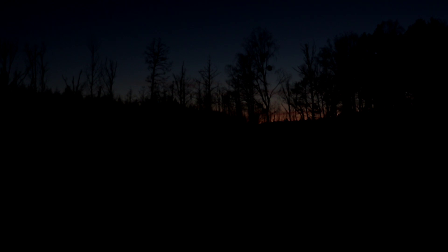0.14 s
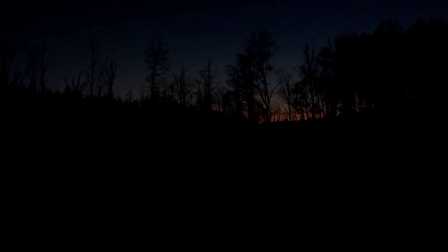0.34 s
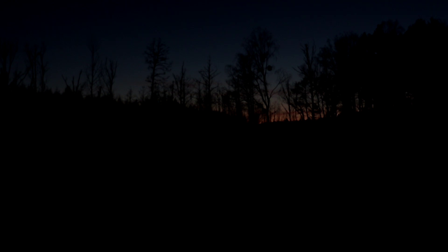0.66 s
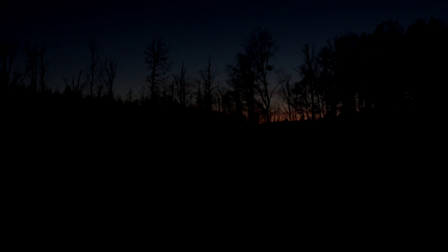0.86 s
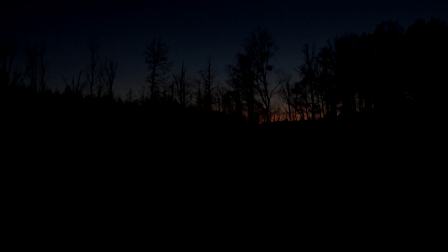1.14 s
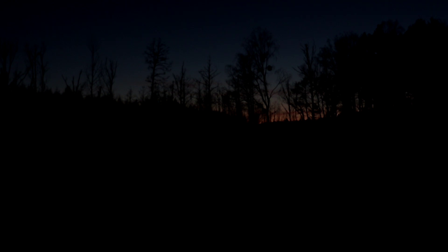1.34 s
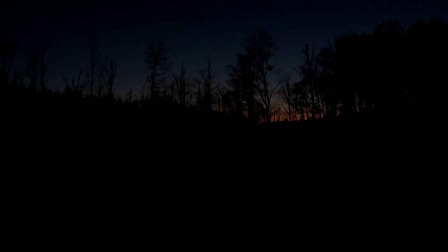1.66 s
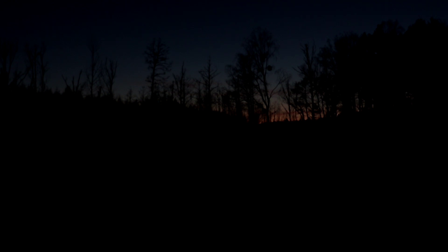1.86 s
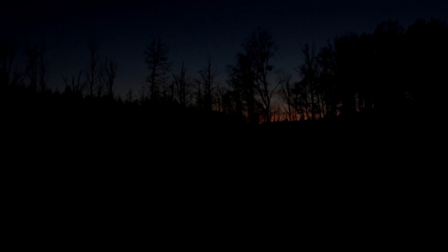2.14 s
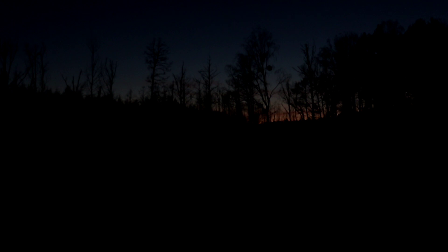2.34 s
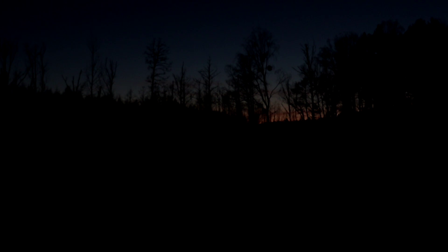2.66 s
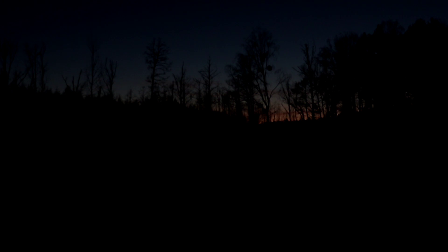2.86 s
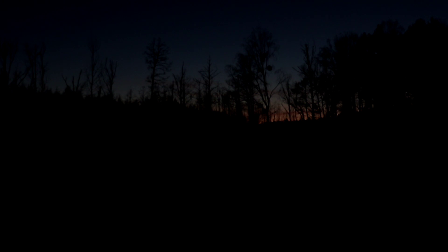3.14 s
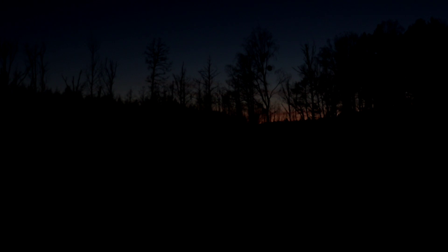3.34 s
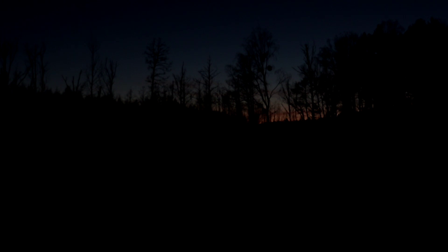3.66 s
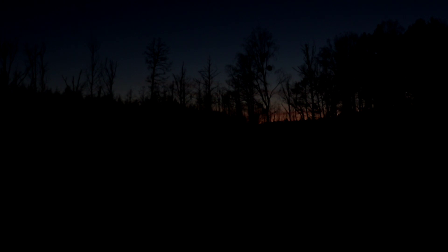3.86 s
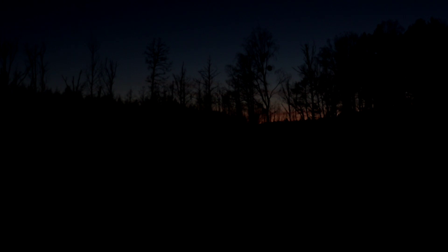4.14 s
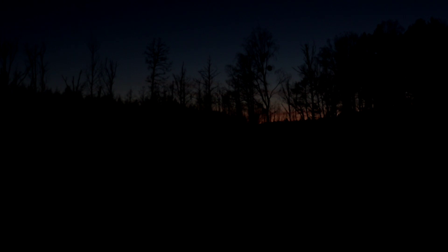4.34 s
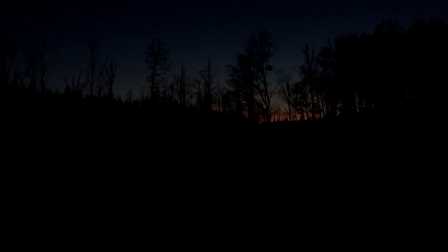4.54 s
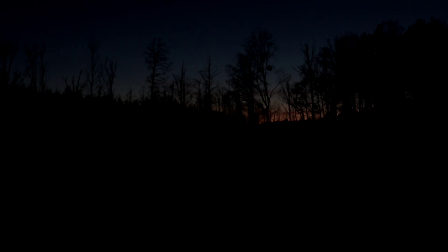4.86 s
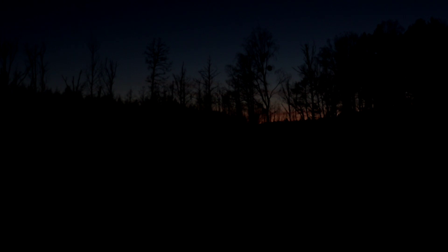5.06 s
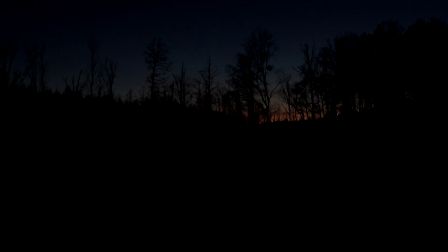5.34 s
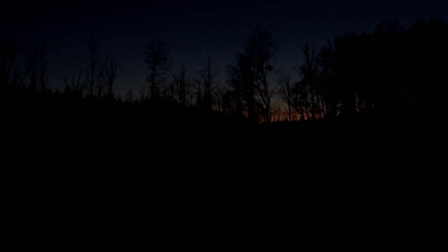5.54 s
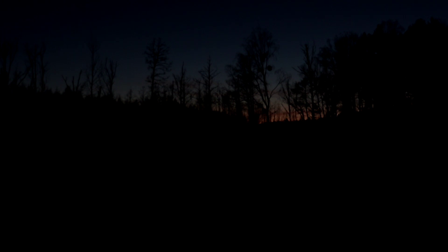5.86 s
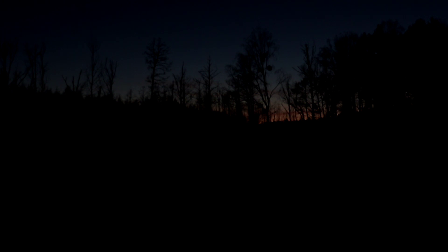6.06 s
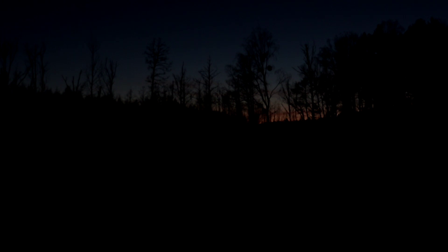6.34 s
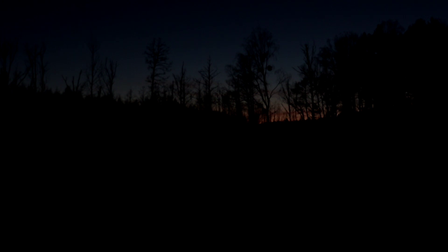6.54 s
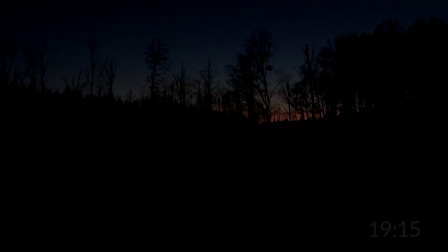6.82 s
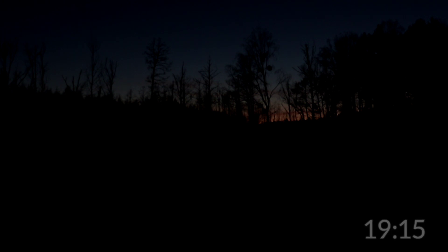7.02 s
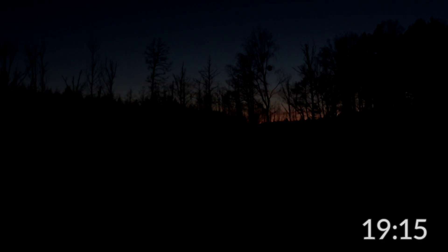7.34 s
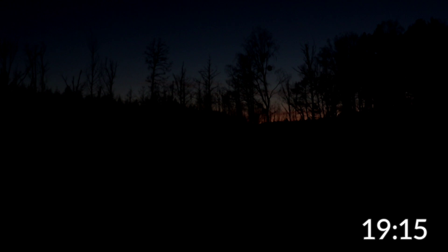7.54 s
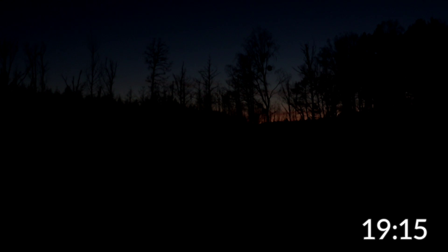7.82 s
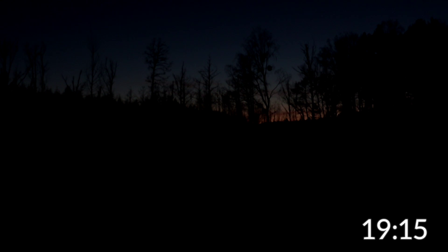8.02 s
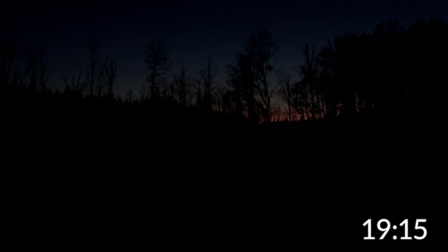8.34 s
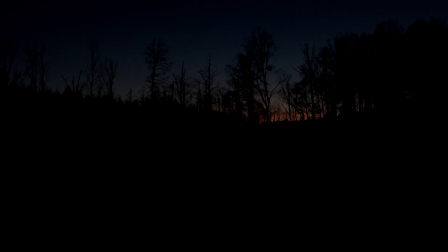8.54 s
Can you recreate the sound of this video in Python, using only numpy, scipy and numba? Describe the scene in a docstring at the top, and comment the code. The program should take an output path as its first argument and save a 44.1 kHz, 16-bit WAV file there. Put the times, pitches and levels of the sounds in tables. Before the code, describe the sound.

A still evening outdoors, close to a wood fire, dry and almost mono over a faint low forest hush. At 0.3 s a sharp lone snap breaks the quiet, with a smaller one just after. From 1 to 2.3 s small sticks knock dully, bark slips briefly and a few thin ticks sound. From 2.4 to 4.2 s the kindling shifts more, with a soft heavier thud, gritty rustling scrapes, hollow knocks and a tiny double squeak near 3.3 s. Around 4.3 s the fire starts to catch: light crackle and simmering sap, with clearer snaps from 5 s and a quick cluster near 5.8 s. From 6.4 s pops become loud and frequent, the hardest near 6.8, 7.8 and 8.1 s, over dense crackle, sizzling hiss, fluttering flame and soft low puffs. It ends at about 8.7 s, still crackling strongly.

```python
"""A wood campfire catches on a still evening outdoors, close to the microphone.
Kindling first shifts, rustles and knocks, with a few lone snaps; then the flames take hold.
Clouds of tiny bursts make the scrape, crackle, sizzle and flutter; snaps are ticks with a ringing cavity,
knocks are damped noise, puffs are single soft swings, and filtered noise gives a faint forest hush."""
import sys
import numpy as np
from scipy import signal
from scipy.fft import rfft, irfft
from scipy.io import wavfile
from scipy.ndimage import uniform_filter1d
from numba import njit

SR = 44100
rng = np.random.default_rng(int(sys.argv[2]) if len(sys.argv) > 2 else 0)


def master(y):
    """Save y as 16-bit WAV."""
    cut = np.clip(np.atleast_2d(y).T, -1, 1)
    pcm = np.round(cut * 32767)  # scale
    wavfile.write(sys.argv[1], SR, pcm.astype(np.int16))


N = 382788  # length in samples


def undb(db):
    """Decibels to gain."""
    return 10 ** (np.asarray(db) / 20)


def unit(x):
    """Scale to rms 1."""
    return x / np.sqrt(np.mean(x ** 2) + 1e-18)


def curves(table):
    """Each column of a timed table, joined by straight lines."""
    s, *columns = np.transpose(table)
    return [np.interp(np.arange(N) / SR, s, column) for column in columns]


def add(out, s, sound):
    """Mix a sound in at time s."""
    i = max(int(s * SR), 0)
    out[i:i + len(sound)] += sound[:max(N - i, 0)]


def walk(rate):
    """Random wander with spread near 1: about rate new values a second, looping after 4096 of them."""
    k = int(SR / rate)
    steps = rng.standard_normal(4096)[np.arange(N) // k % 4096]
    return uniform_filter1d(steps, k)


def swell(start, hold, fade):
    """Gain that fades in, holds at 1 from start, and fades out."""
    corners = [start - fade, start, start + hold, start + hold + fade]
    return np.interp(np.arange(N) / SR, corners, [0, 1, 1, 0])


def together(gains):
    """Joint gain of unrelated sounds: their powers add."""
    return np.sqrt(sum(g ** 2 for g in gains))


def response(points, ripple_db=0, size=1024):
    """Causal impulse response of a colour, with chance resonances of its own and unit energy."""
    f = np.log(np.maximum(np.fft.rfftfreq(size, 1 / SR), 10))
    hz, db = np.transpose(points)
    bumps = np.interp(f, np.linspace(f[1], f[-1], num=22), rng.standard_normal(22))
    colour_db = np.interp(f, np.log(hz), db) + ripple_db * bumps
    # folding the cepstrum gives minimum phase, so the energy comes as early as it can
    cepstrum = irfft(np.log(undb(colour_db)))
    cepstrum[1:size // 2] *= 2
    cepstrum[size // 2 + 1:] = 0
    h = irfft(np.exp(rfft(cepstrum)))
    return h / np.linalg.norm(h)


def through(x, h):
    """Pass a sound through a response."""
    return signal.oaconvolve(x, h)[:len(x)]


def band(x, hz, spread):
    """Broad resonance from hz / spread to hz * spread."""
    sos = signal.butter(1, [hz / spread, hz * spread], "band", fs=SR, output="sos")
    return signal.sosfilt(sos, x)


def swing(x, hz=6500, radius=0.48):
    """An all-pass, like a microphone's phase shift, makes a click swing both ways in a fraction of a millisecond."""
    a = [1, -2 * radius * np.cos(2 * np.pi * hz / SR), radius ** 2]
    return signal.lfilter(a[::-1], a, x)


def splinter(rough, run=0.0012, bounce_db=-12, bounce=0.0031, size=640):
    """One break: a click within a short burst of random smaller clicks, then returns from logs and ground."""
    t = (np.arange(size) - size // 8) / SR
    small_clicks, returns = rng.standard_normal((2, size)) ** 3
    small_clicks *= np.exp(-np.abs(t) / run)
    returns *= np.maximum(t, 0) * np.exp(-2 * np.abs(t) / bounce)
    small_clicks *= rough / np.linalg.norm(small_clicks)
    returns *= undb(bounce_db) / np.linalg.norm(returns)
    return (t == 0) + small_clicks + returns


def thud(hz, size=4096):
    """A small volume of gas igniting: a soft swing of about one cycle, peak 1."""
    cycles = hz * np.arange(size) / SR
    y = np.sin(2 * np.pi * cycles) * cycles * np.exp(-2 * cycles)
    return y / np.abs(y).max()


@njit
def scatter(at, sizes, spots, bank):
    """Lay each burst down with the ring of its own spot."""
    out = np.zeros(N + bank.shape[1])
    for k in range(len(at)):
        for i in range(bank.shape[1]):
            out[at[k] + i] += sizes[k] * bank[spots[k], i]
    return out[:N]


def grains(points, rate, spread_db, ripple_db, rough, count=96):
    """Tiny bursts at random moments, of widely varied strength, from many spots that each ring differently."""
    rings = [np.convolve(response(points, ripple_db)[:512], splinter(rough))[:640] for _ in range(count)]
    bank = swing(np.array(rings))
    at = np.flatnonzero(rng.random(N) < rate / SR)  # rate is in bursts per second
    size_db = spread_db * np.minimum(rng.standard_normal(len(at)), 1.6)
    sign = rng.choice([-1, 1], len(at))
    spots = rng.integers(0, count, len(at))
    out = scatter(at, sign * undb(size_db), spots, bank)
    # divide by the local level, so that the level tables set the loudness
    return out / np.sqrt(uniform_filter1d(out ** 2, SR // 9) + 1e-12)


# Colour of the distant trees: (frequency [Hz], relative density [dB per Hz])
FOREST_COLOUR = [(20, -25), (40, -6.5), (70, -2.5), (110, -1), (150, 1.5), (190, -4.5), (300, -9),
                 (450, -18), (600, -50), (900, -24), (2900, -28), (3600, -31), (9000, -30), (16000, -37)]
# Colour of the nearer breeze: (frequency [Hz], relative density [dB per Hz])
BREEZE_COLOUR = [(150, -8.5), (300, 3), (470, 3), (700, -3), (1300, -4.5), (1850, -4), (2500, -3),
                 (3100, -3), (3700, -14), (5600, -12), (6800, -19), (10000, -21.5), (16000, -25)]
# Air stirring around the camp: (time [s], level [dB])
BREEZE_LEVEL = [(0, -41), (.12, -47), (.3, -51), (.55, -52.5), (.8, -62.5), (.95, -49.5), (1.25, -56.5),
                (1.7, -51), (2.2, -50.5), (3.0, -59.5), (4.3, -52), (4.75, -50.5), (4.9, -57), (8.68, -70)]


def forest(hush_db=-51):
    """A low, even hush of distant trees and a light breeze nearer by, both coloured noise."""
    hush = unit(through(rng.standard_normal(N), response(FOREST_COLOUR, size=8192)))
    breeze = unit(through(rng.standard_normal(N), response(BREEZE_COLOUR)))
    sway_db = 0.8 * walk(3.4)
    breeze_db = curves(BREEZE_LEVEL)[0] + walk(25)
    return hush * undb(hush_db + sway_db) + breeze * undb(breeze_db)


def contacts(scrape, low_hz=2200, turns_db=6, count=3):
    """The contacts take turns, each singing in its own octave of the treble; their joint power stays steady."""
    shares = [undb(turns_db * walk(30)) for _ in range(count)]
    voices = [band(scrape, low_hz * 2 ** k, 1.9) * share for k, share in enumerate(shares)]
    return sum(voices) / together(shares)


# Colour of wood rubbing or cracking dry: (frequency [Hz], relative density [dB per Hz])
SCRAPE_COLOUR = [(600, -6), (1300, -1), (2000, -1.5), (2900, 0.5), (3800, -5), (5400, -3), (6900, -9.5),
                 (9200, -5.5), (12000, -11), (16000, -20.5)]
# Colour of breaking fibres, also in snaps and crackle: (frequency [Hz], relative density [dB per Hz])
FIBRE_COLOUR = [(60, -15), (400, -17.5), (1000, -10.5), (2100, -9), (2900, -0.5), (4000, -6.5),
                (5400, -2.5), (6800, -10), (9200, -5), (11500, -10), (13000, -9), (16000, -16.5)]
# Colour of the hollow pile: (frequency [Hz], relative density [dB per Hz])
HOLLOW_COLOUR = [(120, -17), (250, 2.5), (400, 2), (700, -1.5), (1100, -9), (1900, -21)]
# Pieces of kindling sliding:
# (start [s], hold [s], fade in and out [s], scrape level [dB], hollow body level [dB])
KINDLING_SLIDES = [(1.093, 0.012, 0.017, -51, -47), (1.532, 0.023, 0.02, -52, -53),
                   (1.8, .015, .02, -51, -47), (1.89, 0.084, 0.035, -49, -48.5),
                   (2.147, 0.23, 0.046, -54.5, -69), (2.389, 0.024, .025, -43.5, -46.5),
                   (2.508, 0.013, 0.021, -37.5, -55), (2.573, 0.029, 0.026, -44, -44.5),
                   (2.641, 0.11, 0.026, -43.5, -52), (2.823, 0.13, 0.033, -39.5, -51),
                   (3.088, 0.048, 0.022, -42.5, -49), (3.195, .055, 0.15, -39, -42.5),
                   (3.382, 0.062, 0.037, -35, -43.5), (3.493, 0.028, 0.021, -48, -43.5),
                   (3.568, 0.13, 0.045, -48, -47), (3.733, 0.018, 0.0085, -40, -38),
                   (3.777, 0.17, 0.032, -50, -51), (4.024, 0.046, 0.17, -39, -41.5),
                   (4.201, 0.017, 0.016, -40, -51)]


def kindling(stir_scrape_db=-58, stir_body_db=-59.5):
    """Dry twigs and bark slide in clumps of slips at a few contacts; the pile answers with a hollow body."""
    # the pile never lies quite still
    scrape_gains, body_gains = [undb(stir_scrape_db)], [undb(stir_body_db)]
    for start, hold, fade, scrape_db, body_db in KINDLING_SLIDES:
        motion = swell(start, hold, fade)
        scrape_gains.append(motion * undb(scrape_db))
        body_gains.append(motion * undb(body_db))
    scrape = grains(SCRAPE_COLOUR, rate=2400, spread_db=3.5, ripple_db=2.5, rough=0.75)
    # some fibres catch and tick
    fibres = grains(FIBRE_COLOUR, rate=140, spread_db=6, ripple_db=7.5, rough=0.21)
    scrape = unit(unit(scrape + 0.28 * contacts(scrape)) + undb(-9) * fibres)
    body = grains(HOLLOW_COLOUR, rate=380, spread_db=6, ripple_db=4.5, rough=0.56)
    clumps = walk(110)
    scrape = scrape * together(scrape_gains) * undb(2.2 * clumps)
    return scrape + body * together(body_gains) * undb(clumps)


# The loudest gas pockets bursting in the wood:
# (time [s], peak level [dB], ring pitch [Hz], ring length [cycles], tick against ring [dB])
LOUD_SNAPS = [(0.3283, -10.5, 1640, 1.5, -2.5), (0.4103, -21.5, 4000, 0.89, -15),
              (1.456, -29.5, 10000, 1.3, -1), (1.892, -24.5, 8600, 2.2, -3), (2.2153, -18.5, 5600, 3, 6),
              (3.5053, -21, 9200, 2, -2), (3.799, -20, 6700, 2, 10), (4.164, -22.5, 12800, 4, 2),
              (4.827, -20, 3200, 1.3, 12), (5.083, -18, 2800, 1.1, 3), (5.1676, -14.5, 2600, 1.2, 12),
              (5.396, -14, 5900, 1.7, 4), (5.4214, -14, 2714, 1, 23), (5.6074, -16.5, 3100, 2.2, -4),
              (5.7641, -17, 12800, 3, 2), (5.9136, -20, 12600, 2.5, -16), (5.7928, -11.5, 2670, 1.5, -2),
              (5.8126, -13, 2800, 1.5, -2), (5.8822, -9.5, 2600, 2.4, 3), (6.252, -14, 4500, 1, 4),
              (6.4695, -7.5, 4860, 2.6, 1), (6.5922, -13, 9500, 5.3, 1), (6.6141, -6, 2860, 1.2, -6),
              (6.7845, -1, 2910, 2.8, -14), (6.815, -6, 3150, 1.6, 5), (6.825, -7, 3350, 2, 4),
              (6.8383, -11, 8900, 3.3, -12), (6.9726, -7.5, 3080, 0.63, -4), (6.9906, -6.5, 3120, 2.3, 2),
              (7.1657, -11, 9660, 1.1, -4.5), (7.2236, -7, 3530, 1.16, -3), (7.2661, -8.5, 3440, 0.4, -18),
              (7.389, -9, 3300, 1.9, -11.5), (7.4438, -8.5, 11850, 1.7, -5), (7.4987, -9, 3380, 2.2, -3.5),
              (7.5364, -9, 5100, 1, 4), (7.5617, -10, 9400, 6.5, 3), (7.6392, -6, 3800, 0.89, -5),
              (7.7679, -0.5, 3660, 1.6, -16), (7.7986, -12, 3330, 1.35, 12), (7.829, -5, 4900, 2.6, 4),
              (7.8563, -14, 1820, 0.59, -12), (7.9011, -10.5, 5120, 1.3, 10), (7.9397, -10.5, 3100, .5, 17),
              (8.028, -8.5, 3400, 0.62, 3), (8.0798, -1, 3670, 0.74, -4), (8.1266, -9, 3030, 1.4, 17),
              (8.1948, -10, 4200, 2.5, -1), (8.2194, -11, 5030, 1.3, 12), (8.2272, -9.5, 3610, 1.2, 5),
              (8.3917, -6, 3020, 3.3, -6.5), (8.3918, -5, 4940, 1.5, -11), (8.4084, -9, 7700, 4.4, 0)]


def snaps(rows, size=640, flare_db=-27):
    """A bursting pocket gives a sharp tick, rings its cavity for a few cycles, and its gas flares."""
    out, lead = np.zeros(N), size // 8 / SR  # the break sits this far into its splinter
    t = np.arange(size) / SR
    onset = 1 - np.exp(-t / 0.00056)
    for s, peak_db, hz, cycles, tick_db in rows:
        cavity = np.sin(2 * np.pi * hz * t) * np.exp(-2 * hz * t / cycles) * onset
        ring = through(cavity, splinter(rough=0.1, run=0.00044, bounce_db=-13))
        tick = splinter(rough=0.18, run=0.00038, bounce_db=-8)
        tick = swing(through(tick, response(FIBRE_COLOUR, ripple_db=2.5)))
        snap = rng.choice([-1, 1]) * (unit(ring) + undb(tick_db) * unit(tick))
        add(out, s - lead, undb(peak_db) * snap / np.abs(snap).max())
        # the flare follows 1 to 4 ms later, at a chance pitch
        delay = 0.00219 * rng.uniform(0.4, 1.91)
        flare = thud(480 * 2 ** rng.uniform(-0.7, 0.8))
        add(out, s + delay, undb(peak_db + flare_db) * flare)
    return out


# Sticks knocking as they shift:
# (time [s], body level [dB], body pitch [Hz], noise decay [s], crack level [dB])
STICK_KNOCKS = [(0.4002, -45, 2020, 0.0023, -27.5), (0.968, -42.5, 1210, 0.0082, -55),
                (1.1035, -24.5, 567, 0.0022, -26.5), (1.526, -44.5, 890, 0.017, -42),
                (1.787, -35, 1300, 0.013, -45), (1.892, -36.5, 597, 0.0046, -42),
                (1.922, -39, 600, 0.013, -46), (2.066, -31, 1270, 0.0052, -27.5),
                (2.103, -28, 450, 0.0068, -35.5), (2.104, -37, 1300, 0.0036, -40),
                (2.673, -33, 695, 0.005, -27), (2.682, -31.5, 444, 0.0057, -28.5),
                (2.896, -28, 375, 0.0052, -34), (3.037, -38, 393, 0.012, -42),
                (3.225, -33, 400, 0.0048, -29), (3.462, -24, 590, 0.0017, -23.5),
                (3.551, -32, 1870, 0.0042, -32), (3.7344, -33, 790, 0.0033, -18.5),
                (3.747, -27, 740, 0.0044, -41), (4.024, -33, 400, 0.012, -38),
                (4.062, -37, 350, 0.003, -50)]


def knocks():
    """Each contact gives a dull, quickly damped body and a dry crack."""
    out, t = np.zeros(N), np.arange(4096) / SR
    for s, body_db, hz, decay, crack_db in STICK_KNOCKS:
        body, crack = rng.standard_normal((2, len(t))) * np.exp(-t / decay)
        body = band(band(body, hz, 1.76), hz, 1.76)
        crack = through(crack, response(SCRAPE_COLOUR, ripple_db=0.5))
        body *= undb(body_db) / np.linalg.norm(body)
        crack *= undb(crack_db) / np.linalg.norm(crack)
        # each level sets the energy: that of a steady sound lasting half the decay time
        add(out, s, np.sqrt(decay * SR / 2) * (body + crack))
    return out


def settle(s=2.4, hz=150, level_db=-39, decay=0.02):
    """One heavier piece of wood settles with a dull thud of narrow-band noise."""
    t = np.maximum(np.arange(N) / SR - s, 0)
    envelope = 2 * t / decay * np.exp(1 - 2 * t / decay)  # peaks at 1 after half the decay
    return undb(level_db) * unit(band(rng.standard_normal(N), hz, 1.05)) * envelope


# Bursts of thin, gritty hiss: (start [s], hold [s], level [dB], centre frequency [Hz])
GRITTY_HISSES = [(2.718, 0.023, -49, 5400), (2.823, 0.11, -41.5, 5210), (3.763, 0.04, -43.5, 5380),
                 (6.356, 1, -49.5, 5320), (8.1, 0.41, -48, 4610), (8.377, 0.33, -41, 4730)]


def hiss(fade=0.043):
    """Fine grit rides on a sine, which lifts it to a narrow band at a new pitch in each burst."""
    t = np.arange(N) / SR
    low = signal.butter(1, 520, fs=SR, output="sos")
    grit = unit(signal.sosfilt(low, rng.standard_normal(N))) * undb(6.4 * walk(700))
    out = np.zeros(N)
    for start, hold, level_db, hz in GRITTY_HISSES:
        burst = unit(grit * np.sin(2 * np.pi * hz * t))
        out += burst * undb(level_db) * swell(start, hold, fade)
    return out


def squeak(s=3.2803, hz=5950, level_db=-21, width=0.0019, again=0.0059, low_hz=3900, low_db=-8):
    """A twig squeaks twice on two unsteady tones as it slips along another."""
    t = np.arange(N) / SR - s
    slips = np.exp(-(t / width) ** 2) + 0.84 * np.exp(-((t - again) / width) ** 2)
    high, low = (np.sin(2 * np.pi * np.cumsum(f * (1 + 0.11 * walk(1500))) / SR) for f in (hz, low_hz))
    return undb(level_db) * slips * (high + undb(low_db) * low)


# The fire catching: (time [s], crackle level [dB], flame flutter level [dB])
FIRE_LEVELS = [(4.0, -70, -76), (4.271, -50, -51.5), (4.6, -52.5, -52.5), (4.9, -50.5, -55),
               (5.4, -49.5, -46.5), (5.62, -43.5, -48), (6.05, -43.5, -40.5), (6.35, -40.5, -39),
               (6.5, -36.5, -39.5), (7.0, -38, -36), (7.13, -41, -43.5), (7.33, -40.5, -39.5),
               (7.5, -41, -40), (8.15, -37.5, -41.5), (8.68, -42, -38.5)]
# Colour of boiling sap: (frequency [Hz], relative density [dB per Hz])
SIZZLE_COLOUR = [(100, -35), (1000, -2), (2100, 1), (2850, 2.5), (3900, -0.5), (5400, -12), (6800, -7),
                 (9200, -4), (12000, -7.5), (16000, -25)]
# Spurts of boiling sap: (start [s], hold [s], level [dB])
SAP_SPURTS = [(4.29, .5, -57.5), (5.074, .02, -46), (5.854, 0.81, -45), (6.44, 0.47, -44.5),
              (6.926, 0.13, -38.5), (8.02, 0.51, -43), (8.4, 0.44, -42)]


def crackle(flurry_db=2, spurt_fade=0.024):
    """Fibres split in flurries of small clicks while sap simmers and spurts between them."""
    crackle_db, _ = curves(FIRE_LEVELS)
    clicks = grains(FIBRE_COLOUR, rate=240, spread_db=9.5, ripple_db=6.5, rough=0.29)
    sizzle = grains(SIZZLE_COLOUR, rate=1050, spread_db=9, ripple_db=2.5, rough=0.17)
    simmer_db = -22 + 0.69 * crackle_db  # steady sap follows the crackle
    spurts = [undb(db) * swell(start, hold, spurt_fade) for start, hold, db in SAP_SPURTS]
    sap = together([undb(simmer_db)] + spurts)
    clicks = clicks * undb(crackle_db + flurry_db * walk(14))
    return clicks + sizzle * sap * undb(0.54 * walk(48))


# Colour of the flames: (frequency [Hz], relative density [dB per Hz])
FLAME_COLOUR = [(25, -8), (70, -7), (150, 3), (260, -3), (370, -0.5), (500, -3), (700, -4.5), (950, -16.5),
                (2000, -35)]
# Puffs of igniting gas: (time [s], peak level before eddies [dB], pitch [Hz])
GAS_PUFFS = [(4.948, -28.5, 385), (5.077, -28.5, 360), (5.168, -27.5, 527), (5.498, -29.5, 450),
             (5.729, -25, 332), (5.801, -26.5, 366), (6.919, -26, 397), (7.009, -32, 70), (7.028, -36, 75),
             (7.069, -21.5, 394), (7.31, -25.5, 334), (7.537, -29, 115), (7.541, -21.5, 246),
             (7.549, -17.5, 377), (7.604, -23.5, 365), (7.857, -23, 306), (7.982, -19.5, 340)]


def flames(flicker_db=1):
    """Gas ignites in countless soft thuds; now and then a larger, turbulent puff stands out."""
    _, flutter_db = curves(FIRE_LEVELS)
    thuds = grains(FLAME_COLOUR, rate=320, spread_db=6.5, ripple_db=2.5, rough=0.31)
    out = thuds * undb(flutter_db + flicker_db * walk(13))
    for s, peak_db, hz in GAS_PUFFS:
        puff = thud(hz)
        turbulence = band(band(rng.standard_normal(len(puff)), 740, 2), 740, 2)
        eddies = np.abs(puff) * unit(turbulence)
        add(out, s - 0.001, undb(peak_db) * (puff + 0.29 * eddies))
    return out


def small_snaps(count=160, per_s=16, above_db=23.5, spread_db=1.5, low_hz=2800, high_hz=10000):
    """Snap rows for lesser pockets: random moments once the fire has caught, peaks standing above the crackle."""
    wait, size, pitch = rng.random((count, 3)).T
    s = FIRE_LEVELS[1][0] + np.cumsum(-np.log(1 - wait)) / per_s
    times, crackle_db, _ = np.transpose(FIRE_LEVELS)
    peak_db = np.interp(s, times, crackle_db) + above_db + spread_db * (2 * size - 1)
    hz = low_hz * (high_hz / low_hz) ** (pitch ** 3)  # mostly low in pitch
    cycles, tick_db = 0.69, 3.5
    return [(*row, cycles, tick_db) for row in zip(s, peak_db, hz) if row[0] < N / SR]


def clearing(x, echo_db=-27, fade=0.014):
    """The trees around the camp return very little: a faint, short tail of noise."""
    t = np.arange(8192) / SR
    trees = rng.standard_normal(len(t)) * np.exp(-t / fade) * (1 - np.exp(-t / fade))
    return x + through(x, undb(echo_db) * trees / np.linalg.norm(trees))


def scene():
    """The fire sits straight ahead, almost mono; a very faint side signal is treble and low noise."""
    wood = kindling() + knocks() + settle() + squeak()
    fire = hiss() + snaps(LOUD_SNAPS) + crackle() + flames() + snaps(small_snaps())
    mid = clearing(wood + fire) + forest()
    treble = signal.sosfilt(signal.butter(4, 4500, "high", fs=SR, output="sos"), mid)
    low_noise = unit(band(rng.standard_normal(N), 29, 2.3))
    side = undb(-30.5) * treble * walk(300) + undb(-80.5) * low_noise
    return np.array([mid + side, mid - side])


def record(dry, top_hz=16000):
    """The recorder cuts the highest treble."""
    return signal.sosfilt(signal.ellip(8, 0.2, 70, top_hz, fs=SR, output="sos"), dry)


dry = scene()
out = record(dry)
master(out)
```